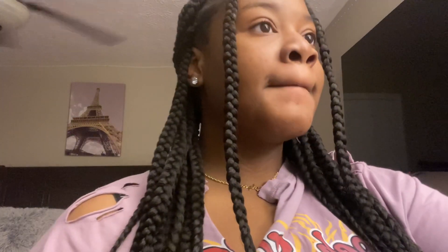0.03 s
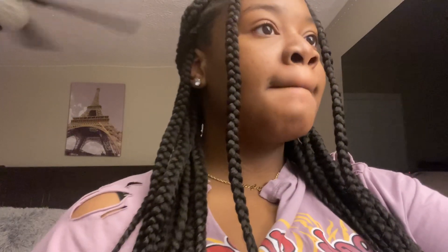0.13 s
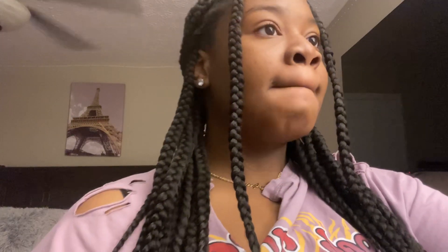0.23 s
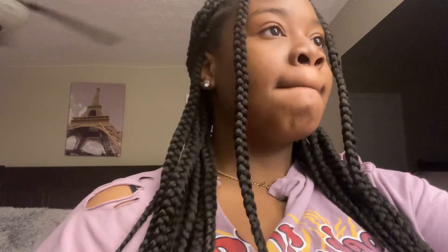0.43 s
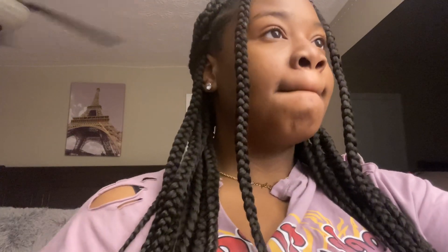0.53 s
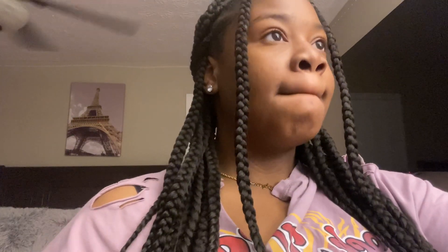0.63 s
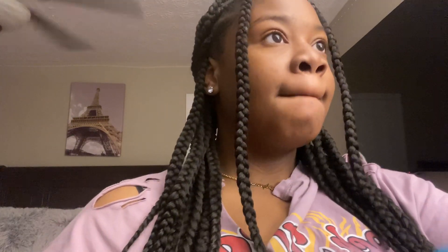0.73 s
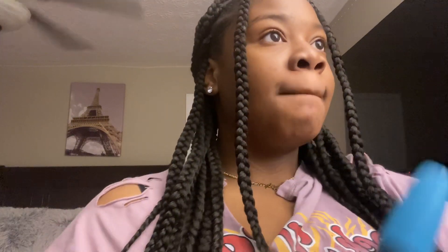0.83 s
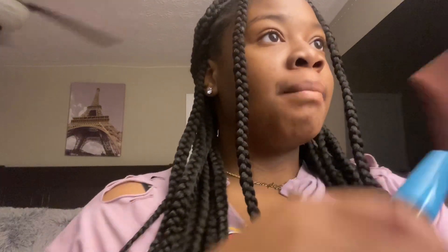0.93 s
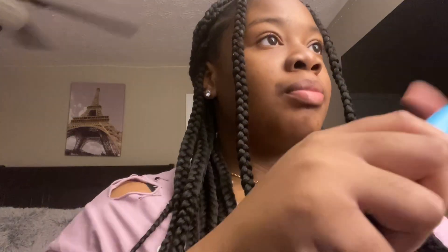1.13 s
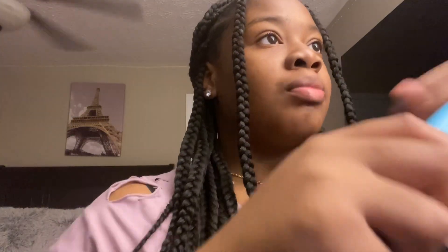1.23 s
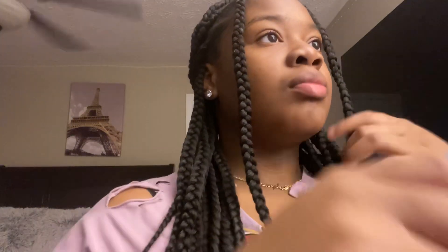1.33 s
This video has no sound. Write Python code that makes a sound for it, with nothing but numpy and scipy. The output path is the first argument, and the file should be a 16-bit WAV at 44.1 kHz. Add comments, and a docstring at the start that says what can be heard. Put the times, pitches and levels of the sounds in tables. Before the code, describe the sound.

A small plastic tube is tapped sharply twice, with a lighter tap between, each a hollow click with soft hand bumps. Faint ticks and a brief slide of skin follow, close to the microphone in a quiet bedroom.

```python
"""Two sharp taps with a light one between, on a small plastic tube held close in a quiet bedroom.
Each tap is a short scratchy click that chirps downward, then the hollow knock of the tube,
a thin ring and a dull thump of what supports it. The hand bumps softly around the taps.
Later come faint ticks, like lips parting or light handling, and a slide of skin on the plastic,
over a low room rumble."""
import sys
import numpy as np
from scipy import signal
from scipy.fft import rfft, irfft, next_fast_len
from scipy.io import wavfile
from scipy.ndimage import uniform_filter1d

SR = 44100
rng = np.random.default_rng(int(sys.argv[2]) if len(sys.argv) > 2 else 0)


def output_pcm(signal):
    """Save a mono or channel-first signal as 16-bit PCM at the path in sys.argv[1].

    Samples are clipped to [-1, 1] before scaling.
    """
    pcm = np.clip(np.atleast_2d(signal).T, -1, 1) * 32767
    wavfile.write(sys.argv[1], SR, np.round(pcm).astype(np.int16))


N = 61739


def amp(db):
    """Decibels to gain."""
    return 10 ** (np.asarray(db) / 20)


def unit(x):
    """Scale to rms 1."""
    return x / np.sqrt(np.mean(x ** 2) + 1e-20)


def along(points, hz):
    """Interpolate (freq_hz, value) points on a log axis."""
    freqs_hz, values = np.transpose(points)
    return np.interp(np.log(hz + 1), np.log(freqs_hz + 1), values)


def hump(hz, centre_hz, octaves):
    """Bell on the pitch axis, 1 at its centre."""
    return np.exp(-(np.log2((hz + 1) / centre_hz) / octaves) ** 2 / 2)


def pan(db):
    """Stereo gains for a level difference, left minus right."""
    return amp([[db / 2], [-db / 2]])


def since(start_s):
    """Seconds since a moment, zero before it."""
    return np.maximum(np.arange(N) / SR - start_s, 0)


def burst(start_s, rise_s, hold_s, t60_s):
    """Envelope: rise, hold, exponential fall."""
    return (1 - np.exp(-since(start_s) / rise_s)) * amp(-60 * since(start_s + hold_s) / t60_s)


def swell(centre_s, width_s):
    """Gaussian envelope."""
    return np.exp(-((since(0) - centre_s) / width_s) ** 2 / 2)


def filtered(x, response):
    """Apply a frequency response."""
    size = next_fast_len(N + SR // 2)
    return irfft(rfft(x, size) * response(np.fft.rfftfreq(size, 1 / SR)), size)[..., :N]


def noise(spectrum, coherence):
    """Coloured stereo noise, rms 1; coherence is a number or a table over frequency."""
    def response(hz):
        alike = along(coherence, hz) if np.ndim(coherence) else np.full_like(hz, coherence)
        angle = np.arccos(np.clip(alike, -1, 1)) / 2
        return amp(along(spectrum, hz)) * [np.cos(angle), np.sin(angle)]
    mid, side = filtered(rng.standard_normal((2, N)), response)
    return unit(np.array([mid + side, mid - side]))


def mode(start_s, pitch_hz, t60_s, rise_s, left_lag_s=0.00044):
    """Damped vibration; the tube is nearer the right microphone, so the left lags."""
    return np.array([np.sin(2 * np.pi * pitch_hz * since(at_s)) * burst(at_s, rise_s, 0, t60_s)
                     for at_s in (start_s + left_lag_s, start_s)])


# room rumble and hiss: freq_hz, density_db
RUMBLE_SPECTRUM = [(12, -48), (20, -25.5), (39, -5.5), (124, -1), (146, -11), (195, -10.5), (317, -16),
                   (545, -22.5), (783, -30), (990, -28), (1500, -42), (1950, -57), (3300, -120)]
HISS_SPECTRUM = [(800, -15), (1500, 0), (2700, 0), (5000, -3), (9000, -5), (10500, -14), (12500, -9),
                 (13800, -12), (14800, -28)]
# left-right likeness of the rumble: freq_hz, coherence
RUMBLE_COHERENCE = [(50, 0.85), (130, 0.69), (300, 0.1), (1000, 0.073)]


def room_tone():
    """Steady low rumble of the room and a faint hiss."""
    rumble = amp(-52.5) * noise(RUMBLE_SPECTRUM, RUMBLE_COHERENCE)
    hiss = amp(-84) * noise(HISS_SPECTRUM, coherence=0.82)
    return rumble + hiss


# bedroom reverberation: freq_hz, t60_s
ROOM_DECAY = [(150, .2), (600, .19), (1200, .28), (2200, .27), (5000, .22), (14000, .19)]
# strength of the reverberation: freq_hz, gain_db
ROOM_GAIN = [(300, 4.5), (600, 7.5), (1100, 4), (2000, 2.5), (2800, -1.5), (5000, -7), (8500, -3),
             (12000, -3)]


def reverb(x, delay_s, build_s):
    """The bedroom's diffuse answer, different at each microphone."""
    hz, time_s, frames = signal.stft(rng.standard_normal((2, SR // 2)), SR, nperseg=256)
    decay = amp(-60 * time_s / along(ROOM_DECAY, hz)[:, None])
    tail = signal.istft(frames * decay, SR, nperseg=256)[1]
    tail *= 1 - np.exp(-since(delay_s)[:tail.shape[1]] / build_s)
    answer = signal.fftconvolve(x[1:], tail / np.linalg.norm(tail[0]), axes=1)[:, :N]
    return filtered(answer, lambda hz: amp(along(ROOM_GAIN, hz)))


# hand bumps: start_s, level_db, pitch_hz, t60_s
HAND_BUMPS = [(0.147, -40, 162.7, 0.46), (0.246, -29, 73.9, 0.081), (.284, -34.5, 93.6, 0.3)]
# hand rub: freq_hz, density_db
RUB_SPECTRUM = [(100, -12), (400, 8), (700, -4), (1300, -25), (3000, -27.5), (8000, -48)]


def hand():
    """Soft low bumps around the taps and a dull rub as the tube is brought closer."""
    bumps = sum(amp(level_db) * mode(start_s, pitch_hz, t60_s, rise_s=0.0098, left_lag_s=0.001)
                for start_s, level_db, pitch_hz, t60_s in HAND_BUMPS)
    rub = amp(-57) * swell(1.327, width_s=0.021) * noise(RUB_SPECTRUM, coherence=0.17)
    return pan(-5) * bumps + rub


# dry tick: freq_hz, density_db
TICK_SPECTRUM = [(300, -20), (1500, -8), (2200, 0), (4000, -5), (8500, 0), (10500, -8), (13000, -2),
                 (16000, -14)]


def tick(start_s, bright_hz):
    """Tiny dry tick, like lips parting or light handling, boosted around bright_hz."""
    hiss = noise(TICK_SPECTRUM, coherence=0.6)
    boosted = filtered(hiss, lambda hz: amp(9 * hump(hz, bright_hz, octaves=0.4)))
    return unit(boosted) * burst(start_s, rise_s=0.0003, hold_s=0.0015, t60_s=0.012)


# faint ticks: start_s, level_db, bright_hz
FAINT_TICKS = [(.6146, -81, 6000), (.7133, -81, 3600), (.9628, -70, 5800), (.9890, -56, 10000),
               (1.2501, -77, 10000)]
# sliding skin: freq_hz, density_db
SLIDE_SPECTRUM = [(500, -6), (3000, -6), (6000, 0), (9000, -1), (10500, -14), (11800, -2), (13400, 0),
                  (15000, -32)]


def ticks_and_slide():
    """Faint ticks, and one short, grainy slide of skin on the tube."""
    ticks = sum(amp(level_db) * tick(start_s, bright_hz) for start_s, level_db, bright_hz in FAINT_TICKS)
    grain_db = 1.5 * unit(uniform_filter1d(rng.standard_normal(N), size=128))
    friction = unit(amp(grain_db)) * noise(SLIDE_SPECTRUM, coherence=0.11)
    slide = amp(-67) * swell(1.018, width_s=0.031) * friction
    return ticks + slide + amp(-18.5) * reverb(ticks, delay_s=0.0026, build_s=0.0016)


# low modes of the support: pitch_hz, level_db, t60_s
SUPPORT_MODES = [(133.8, -0.5, 0.087), (173.8, -1.5, 0.053)]


def thump(start_s):
    """The support gives way just after the tap, with a dull low note."""
    return pan(-9) * sum((-1) ** k * amp(level_db) * mode(start_s + 0.0065, pitch_hz, t60_s, rise_s=0.002)
                         for k, (pitch_hz, level_db, t60_s) in enumerate(SUPPORT_MODES))


def shelf_db(hz, treble_db, corner_hz=9000):
    """Treble shelf that dulls the top of a tap."""
    return treble_db * hz ** 4 / (hz ** 4 + corner_hz ** 4)


# high modes of the tube: pitch_hz, level_db, t60_s, pan_db
RING_MODES = [(2440, -4, .045, -4), (2790, 5, .033, -5), (3380, 1, .025, -5), (4920, 13, .014, -7),
              (5453, -1.5, .15, -6), (5505, 0, .06, -5), (7030, 4, .035, -1), (8420, -3, .08, 1),
              (12020, -8, .025, 0), (14540, -12.5, .15, 0)]


def ring(start_s, treble_db):
    """Thin high modes outlast the click, slightly different at each tap."""
    out = np.zeros((2, N))
    for pitch_hz, level_db, t60_s, pan_db in RING_MODES:
        gain = amp(level_db + shelf_db(pitch_hz, treble_db) + rng.normal(0, 1)) * pan(pan_db)
        detuned_hz = pitch_hz * (1 + rng.normal(0, 0.0024))
        lag_s = rng.normal(0, 0.22) / pitch_hz
        out += gain * mode(start_s, detuned_hz, t60_s, rise_s=0.001, left_lag_s=lag_s)
    return out


# hollow modes of the tube: pitch_hz, level_db, t60_s, pan_db
HOLLOW_MODES = [(268, -22, .12, -3), (395, -21, .06, -4), (540, -3.5, .09, -7), (642, -1.5, .07, -7),
                (688, -10, .055, -10), (802, -7, .07, -11), (933, -14.5, .085, -3), (1070, -18, .12, -4),
                (1115, -15, .08, -4), (1410, -15, .05, -6), (1745, -22, .05, -4)]


def knock(start_s, spot_hz, spot_db):
    """Hollow body: the spot struck favours modes near spot_hz; neighbours swing oppositely."""
    out = np.zeros((2, N))
    for k, (pitch_hz, level_db, t60_s, pan_db) in enumerate(HOLLOW_MODES):
        gain = amp(level_db + spot_db * hump(pitch_hz, spot_hz, octaves=0.2)) * pan(pan_db)
        out += (-1) ** k * gain * mode(start_s + 0.001, pitch_hz, t60_s, rise_s=0.001)
    return out


def dispersion(hz):
    """Bending waves in the shell carry treble fastest, so a click chirps downward."""
    travel_1khz_s = 0.006
    slowness = np.sqrt(1000 / np.maximum(hz, 1500))
    delay_s = travel_1khz_s * np.maximum(slowness - np.sqrt(1000 / 6000), 0)
    return np.exp(-2j * np.pi * np.cumsum(delay_s) * hz[1])


# fingertip contact: freq_hz, density_db
CLICK_SPECTRUM = [(200, 5), (450, 6.5), (750, -1.5), (1400, 4.5), (1750, 0), (2200, 2), (3100, -10),
                  (3700, -1), (6000, -8), (8600, 1.5), (10500, -34.5), (13000, -8), (15500, -41.5)]
# stereo balance of the click: freq_hz, pan_db
CLICK_BALANCE = [(1000, -3), (4500, -6), (8000, 0), (14000, 0)]
# broad shell resonances: centre_hz, width_hz, boost_db
SHELL_RESONANCES = [(1087, 71, 5.5), (2714, 165, 17.5), (4220, 220, 7.5), (5280, 325, 11.5),
                    (6530, 314, 9.5), (11960, 354, 14)]


def click(start_s, treble_db):
    """The click swells in softly, strikes and lands again, coloured by the shell."""
    def colour(hz):
        shell_db = sum(boost_db * np.exp(-((hz - centre_hz) / width_hz) ** 2 / 2)
                       for centre_hz, width_hz, boost_db in SHELL_RESONANCES)
        balance_db = np.outer([0.5, -0.5], along(CLICK_BALANCE, hz))
        return amp(shell_db + shelf_db(hz, treble_db) + balance_db)
    soft_onset = amp(-24.5) * swell(start_s - 0.0015, width_s=0.0069)
    strike, settle = (burst(at_s, rise_s=0.001, hold_s=0.0022, t60_s=0.02)
                      for at_s in (start_s, start_s + 0.0071))
    scratch = unit(filtered(noise(CLICK_SPECTRUM, coherence=0.36), colour))
    return filtered(scratch * (soft_onset + strike + amp(-11) * settle), dispersion)


# taps on the tube: start_s, click_db, knock_db, thump_db, ring_db, treble_db, spot_hz, spot_db
TUBE_TAPS = [(0.205, -30.5, -27.5, -25.5, -45.5, -2, 680, 6),
             (0.2876, -43.5, -61.5, -64.5, -54, -19.5, 1120, 34.5),
             (0.3891, -32.5, -25.5, -32, -41, -5.5, 589, 3)]


def taps():
    """Click, ring, knock and thump of each tap, with the room's answer."""
    out = np.zeros((2, N))
    for start_s, click_db, knock_db, thump_db, ring_db, treble_db, spot_hz, spot_db in TUBE_TAPS:
        bright = amp(click_db) * click(start_s, treble_db) + amp(ring_db) * ring(start_s, treble_db)
        hollow = amp(knock_db) * knock(start_s, spot_hz, spot_db)
        low = amp(thump_db) * thump(start_s)
        send = amp(-8) * bright + amp(-20) * hollow + amp(-5.5) * low
        out += bright + hollow + low + reverb(send, delay_s=0.0016, build_s=0.00185)
    return out


def scene():
    """Everything that reaches the two microphones."""
    return taps() + ticks_and_slide() + hand() + room_tone()


def record(dry):
    """Brick-wall low-pass."""
    return filtered(dry, lambda hz: hz < 15600)


dry = scene()
out = record(dry)
output_pcm(out)
```